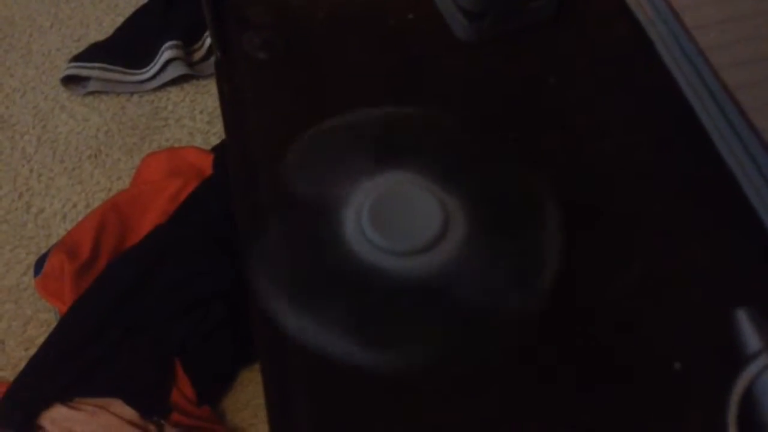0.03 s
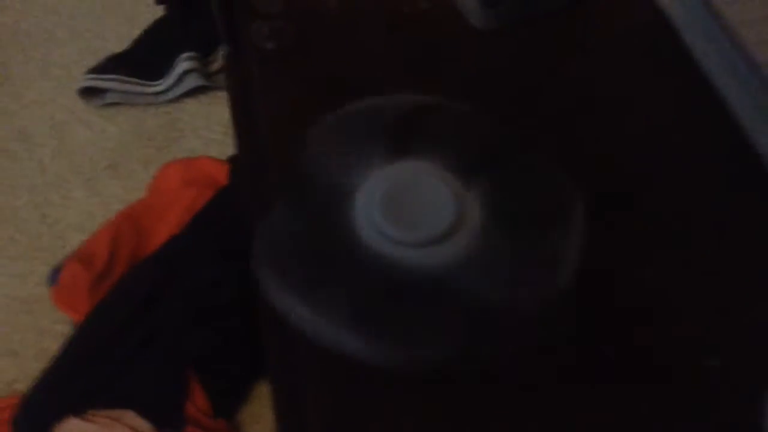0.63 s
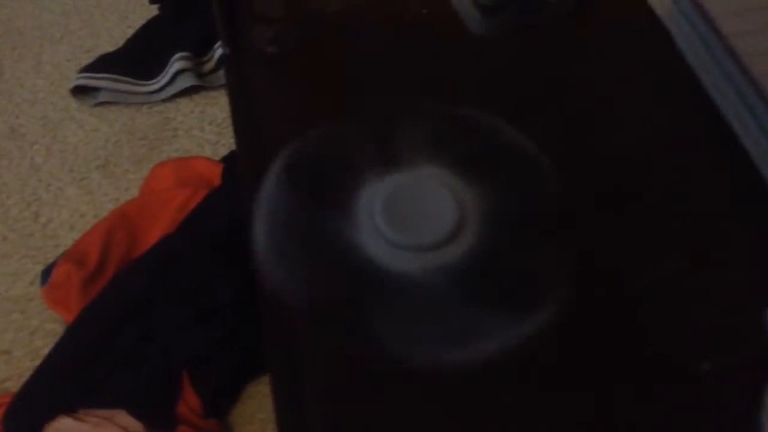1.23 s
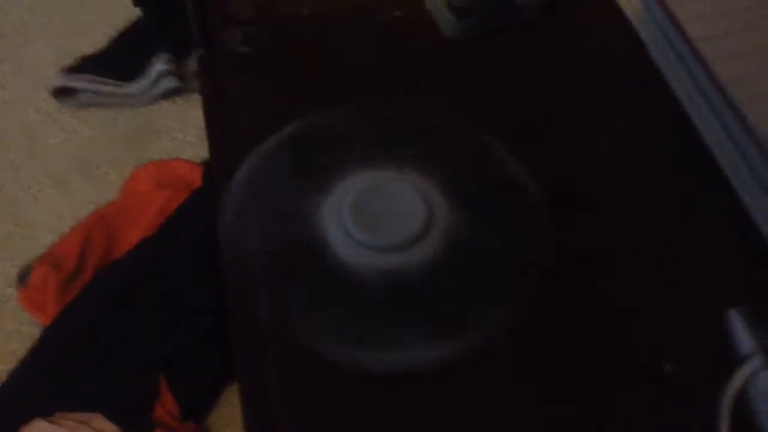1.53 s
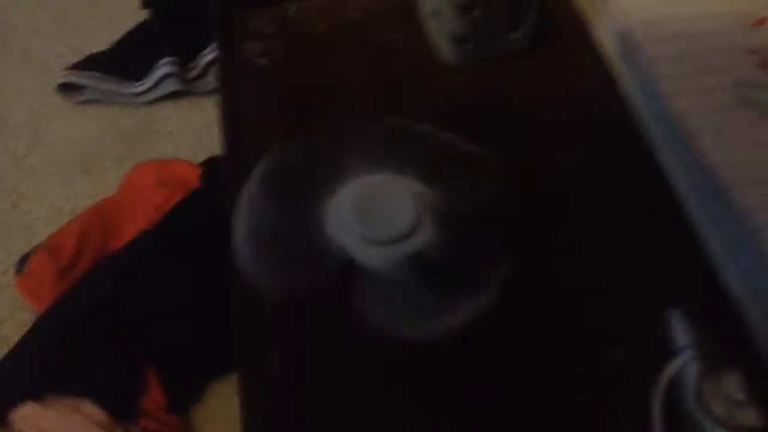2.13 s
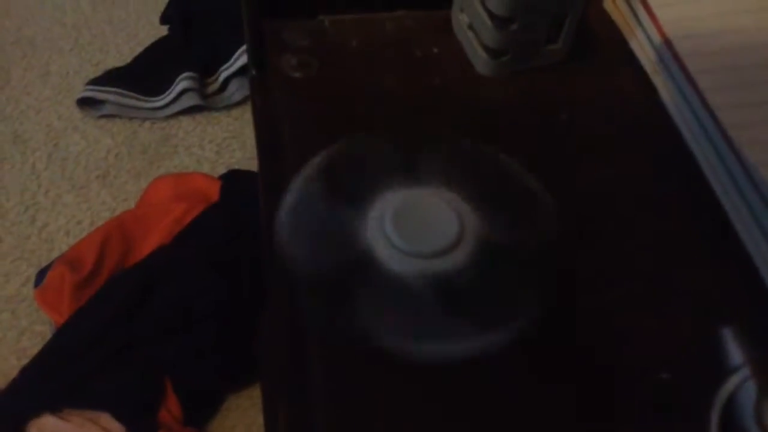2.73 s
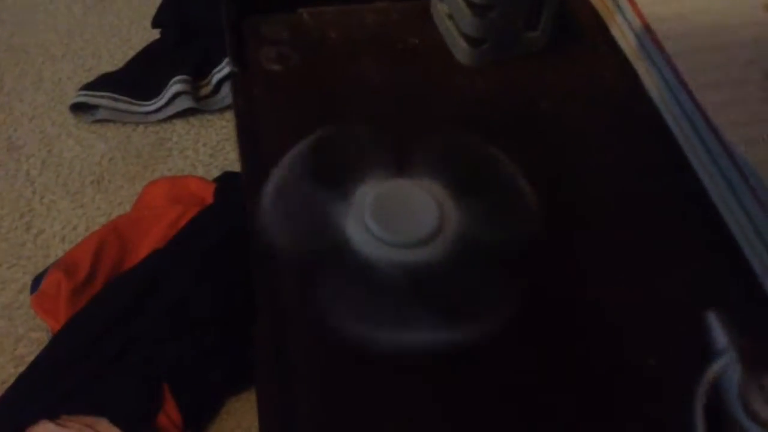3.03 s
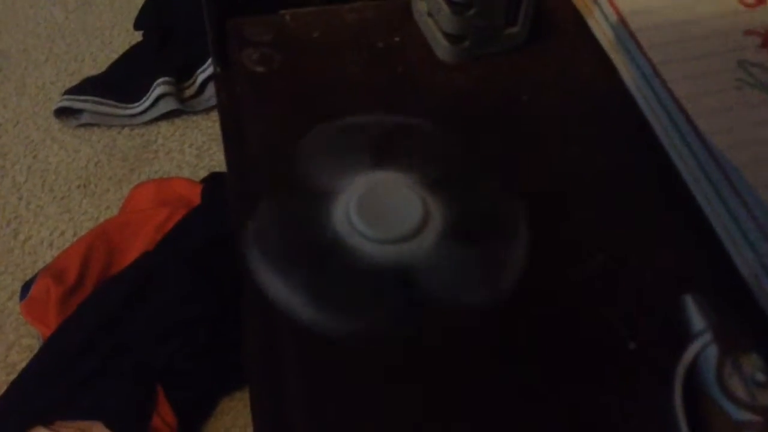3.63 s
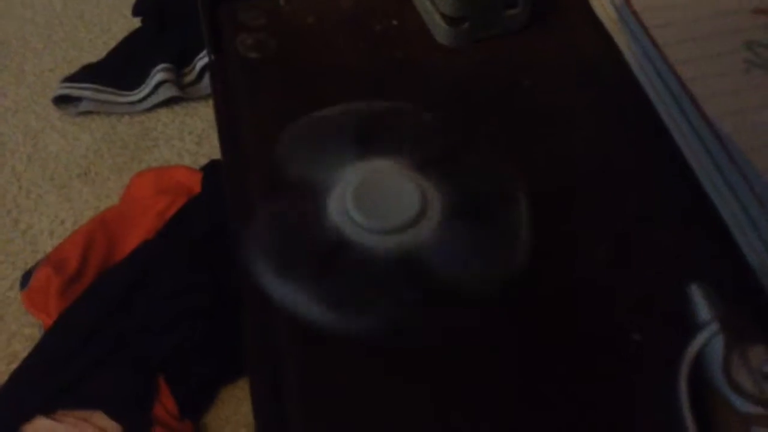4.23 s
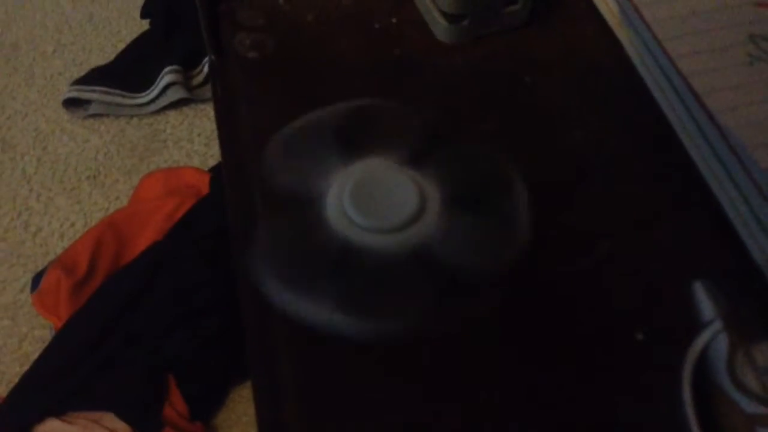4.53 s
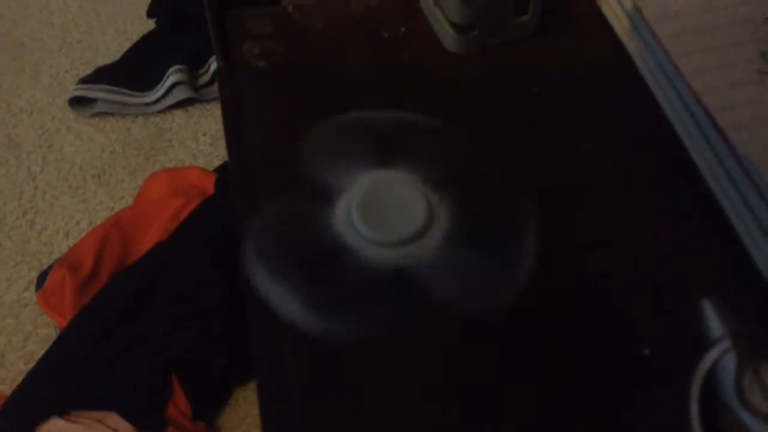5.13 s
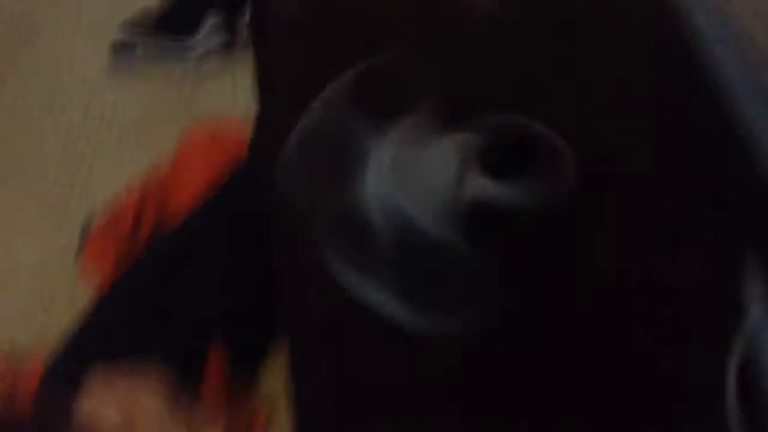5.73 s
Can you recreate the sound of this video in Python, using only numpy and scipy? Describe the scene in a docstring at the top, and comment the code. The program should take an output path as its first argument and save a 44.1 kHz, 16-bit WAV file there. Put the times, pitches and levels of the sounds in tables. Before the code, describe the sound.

Faint bearing hiss and rumble of a coasting fidget spinner, interrupted by a bright click and close handling thumps and rubs.

```python
"""Fidget spinner on a desk

A spinner coasts in a quiet room: its steel bearing hisses, slowly fading, and rumbles through the desk.
Something hard scuffs and snaps close by. Then fingers shift on the hand-held recorder, bumping and
rubbing its case, and do so again near the end. A faint electronic whine sits under it all."""
import sys
import numpy as np
from scipy import signal
from scipy.fft import rfft, irfft
from scipy.io import wavfile

SR = 44100
rng = np.random.default_rng(int(sys.argv[2]) if len(sys.argv) > 2 else 0)


def store_wav(level_fs):
    """Save 16-bit WAV to argv[1]."""
    pcm = np.round(np.clip(np.atleast_2d(level_fs), -1, 1) * 32767)
    wavfile.write(sys.argv[1], SR, pcm.T.astype(np.int16))


N = 259308
TIME = np.arange(N) / SR
BIN_HZ = np.maximum(np.fft.rfftfreq(N, 1 / SR), 1)


def from_db(db):
    """Decibels to gain."""
    return 10 ** (np.asarray(db) / 20)


def rms_one(x):
    """Scale to unit rms."""
    return x / np.sqrt(np.mean(x ** 2) + 1e-20)


def colour(points):
    """An EQ curve drawn through (Hz, dB) points."""
    hz, db = np.transpose(points)
    return from_db(np.interp(np.log(BIN_HZ), np.log(hz), db))


def shaped(x, curve):
    """Steady sound through an EQ curve, at unit rms."""
    return rms_one(irfft(rfft(x) * curve, N))


def butter(x, hz, kind, order=2):
    """Causal low- or high-pass."""
    return signal.sosfilt(signal.butter(order, np.clip(hz, 10, .45 * SR), kind, fs=SR, output="sos"), x)


def grains(per_s, spread_db):
    """Random micro-impacts of uneven size, at unit rms."""
    sizes = from_db(spread_db * np.minimum(rng.exponential(1, N), 5)) * rng.choice([-1, 1], N)
    return rms_one(sizes * (rng.random(N) < per_s / SR))


def struck(modes, t, pitch=1, ring=1):
    """Decaying modes after a blow at t = 0."""
    return sum(from_db(db - 60 * t / (t60 * ring)) * np.cos(2 * np.pi * hz * pitch * t)
               for hz, db, t60 in modes)


def add(out, start_s, sound):
    """Mix a short sound in at its start time."""
    at = round(start_s * SR)
    out[at:at + len(sound)] += sound[:N - at]


def waver(rate_hz, depth_db):
    """A gain that glides between random levels."""
    knots = np.arange(0, TIME[-1] + 1, 1 / rate_hz)
    return from_db(depth_db * np.interp(TIME, knots, rng.standard_normal(N)[:len(knots)]))


def swell(start, end, lateness):
    """An envelope that builds, peaks after the middle and fades."""
    return np.sin(np.pi * np.interp(TIME, [start, end], [0, 1]) ** lateness)


def whine(hz=12000, level_db=-72):
    """The thin, steady tone of the electronics."""
    return from_db(level_db) * np.sin(2 * np.pi * hz * TIME)


def finger_rubs(fast_rasp_db=-35.5, rasp_db_per_octave=130):
    """Skin sticks and slips on the case: coarse slips rumble, fine ones rasp."""
    # Finger strokes. Each row: start and end in seconds, rumble level in dB, rasp level in dB.
    strokes = [(1.779, 1.853, -44.5, -35.5), (2.034, 2.168, -51, -49.5), (2.188, 2.219, -42, -50.5),
               (2.196, 2.28, -43.5, -62), (2.288, 2.387, -48.5, -52), (5.24, 5.372, -54.5, -77),
               (5.478, 5.536, -49.5, -65), (5.625, 5.685, -44.5, -54.5), (5.671, 5.76, -43, -53)]
    # EQ curves of the rumble and the rasp. Each row: frequency in Hz, gain in dB.
    rumble_eq = [(30, -38), (100, -9), (150, 6.5), (230, 12), (400, 2.5), (1200, -6.5), (2000, -19.5),
                 (3500, -32), (6000, -28)]
    rasp_eq = [(500, -12), (1050, 2), (1400, -5), (1900, -3.5), (2800, -13), (3900, -13.5), (4500, 4),
               (5650, 3.5), (6150, 4.5), (7400, -3.5), (9000, -11), (10000, -15), (15000, -41)]
    rumble = shaped(grains(per_s=900, spread_db=3.0), colour(rumble_eq))
    fine_slips = grains(per_s=20000, spread_db=.5)
    out = np.zeros(N)
    for start, end, rumble_db, rasp_db in strokes:
        pitch = 2 ** ((rasp_db - fast_rasp_db) / rasp_db_per_octave)   # faster is louder and higher
        rasp = shaped(fine_slips, colour(np.array(rasp_eq) * [pitch, 1]))
        out += swell(start, end, lateness=1.25) * (from_db(rumble_db) * rumble + from_db(rasp_db) * rasp)
    return out


def finger_bumps(firm_contact_hz=1150):
    """A fingertip thuds on the hand-damped case; the harder the contact, the louder its tick."""
    # Fingertip hits. Each row: start in seconds, level in dB, rebound from 0 (stays on) to 1
    # (springs off), ring-length factor, contact cut-off in Hz.
    hits = [(1.356, -42.5, 0.4, .9, 400), (1.7577, -7.5, 0.99, 1.0, 1125), (1.9746, -32, .1, 1.0, 900),
            (1.9901, -18.5, 0.15, 1.0, 1580), (1.9951, -20.5, 0.22, 1.0, 1450), (2.08, -35, .1, .8, 600),
            (2.1248, -29, 0, 1.0, 950), (2.234, -37, .4, .8, 650), (2.254, -37, 0.1, 1.0, 450),
            (2.383, -38, .1, 0.57, 450), (4.047, -49, .05, .9, 300), (5.271, -43, 0.1, .9, 450),
            (5.5559, -27, 0.55, 0.19, 1200), (5.655, -36.5, .15, 1.0, 650), (5.699, -30, 0.65, .5, 890),
            (5.719, -32, 0.6, 0.55, 1050), (5.733, -31, 0.47, .9, 720)]
    # The case's low thud and high tick modes. Each row: frequency in Hz, level in dB, T60 in seconds.
    thud_modes = [(212, 2.5, 0.039), (319, -11, 0.053), (523, -17.5, 0.012), (985, -21, 0.015)]
    tick_modes = [(4600, -7.5, 0.0073), (5430, -2, 0.003), (5870, -16, .003)]
    out, t = np.zeros(N), TIME[:SR // 8]
    tick = butter(struck(tick_modes, t), 3550, "high", order=4)
    tick = butter(tick, 8300, "low", order=4)
    for start, db, rebound, ring, contact_hz in hits:
        pitch = .85 + 0.18 * rebound   # a finger that stays on loads the case and lowers its ring
        bass_cut_hz = 58 * 2 ** (1.92 * rebound)   # one that springs off leaves little bass
        thud = butter(struck(thud_modes, t, pitch, ring), contact_hz, "low", order=5)
        thud = butter(thud, bass_cut_hz, "high", order=4)
        tick_db = -12 + 12 * np.log2(contact_hz / firm_contact_hz)
        add(out, start, from_db(db) * (thud + from_db(tick_db) * tick))
    return out


def snaps(touches=3, gap_s=.002, loss_db=6, crack_db=-4, tail_db=-5, tail_t60_s=0.014):
    """Each snap chatters: quick touches, each weaker than the last, each a crack with a short tail."""
    # Hard snaps and small ticks. Each row: start in seconds, level in dB.
    hits = [(1.166, -45), (1.457, -33), (1.472, -28.5), (1.508, -31), (1.5243, -14), (1.5336, -6),
            (3.19, -42)]
    # Bright modes of the snapped thing. Each row: frequency in Hz, level in dB, T60 in seconds.
    crack_modes = [(6210, 0.5, 0.0069), (8200, -14, 0.0072), (10700, 3, 0.0038), (13400, 0, .002)]
    # EQ curve of the dense ring-out. Each row: frequency in Hz, gain in dB.
    tail_eq = [(88, -54.5), (150, -16), (1550, -17.5), (3060, -21.5), (4330, -12.5), (5150, -20.5),
               (6250, -2.5), (7730, -11.5), (8190, -2.5), (10300, -10), (15200, -20)]
    out, t = np.zeros(N), TIME[:SR // 10]
    crack = butter(struck(crack_modes, t), 4600, "high", order=3)
    tail_noise = shaped(rng.standard_normal(N), colour(tail_eq))
    decay = from_db(-60 * t / tail_t60_s)
    for start, db in hits:
        for touch in range(touches):
            tail = np.roll(tail_noise, rng.integers(N))[:len(t)] * decay
            contact = from_db(crack_db) * crack + from_db(tail_db) * tail
            add(out, start + touch * gap_s, from_db(db - touch * loss_db) * contact)
    return out


def wash_and_scuffs():
    """A faint, soft wash of noise swells and fades around the snaps; three short scuffs sit on top."""
    # The wash first, then the three scuffs. Each row: start and end in seconds, level in dB.
    swells = [(1.305, 1.702, -48.5), (1.456, 1.486, -38), (1.482, 1.526, -36.5), (1.525, 1.593, -40.5)]
    # EQ curve of the noise they share. Each row: frequency in Hz, gain in dB.
    noise_eq = [(470, -28.5), (800, -13.5), (1170, -8), (1460, -6), (2990, -6), (3970, 1), (4600, -6.5),
                (8410, 2), (15200, -1)]
    noise = shaped(grains(per_s=20000, spread_db=3.0), colour(noise_eq))
    envelope = sum(from_db(db) * swell(start, end, lateness=1.1) for start, end, db in swells)
    return noise * envelope


def desk_response(early):
    """Desk and spinner resonances, heard from the early (1) or late (0) microphone position."""
    # Resonances the bearing drives. Each row: frequency and width in Hz, level in dB,
    # extra dB at the early position.
    resonances = [(245, 83, 0, -0.6), (307, 37, 2, -1.3), (380, 27, 1, -2.5), (458, 64, -5.5, 6),
                  (552, 226, -2, -1.5), (685, 99.5, 2, 1.2), (914, 72, -6, -3), (1013.4, 124, -4.5, 5),
                  (1279, 136, -10, 1.2), (1490, 190, -19.5, 0.4), (1650, 198, -14.5, 6.5),
                  (2040, 440, -22.5, 4), (2334, 125, -12.5, 4.5), (2470, 157, -12, 3.5),
                  (2744, 61, -24.5, 12.6), (2867, 340, -16.5, 1.2)]
    # The broad floor under them. Each row: frequency in Hz, gain in dB.
    floor_eq = [(30, -45.5), (60, -43.5), (100, -26.5), (160, -10), (300, -8.5), (800, -31), (2000, -29),
                (3300, -32.5), (5000, -21.5), (9000, -25.5)]
    power = sum(from_db(db + early * extra_db) ** 2 / (1 + (1.49 * (BIN_HZ - hz) / width) ** 2) ** 3
                for hz, width, db, extra_db in resonances)
    return np.sqrt(power + colour(floor_eq) ** 2)


def race_response():
    """Tone of the steel balls in their race: a broad hiss, lifted where the race rings."""
    # EQ curve of the hiss. Each row: frequency in Hz, gain in dB.
    hiss_eq = [(1880, -55), (3200, -21), (3510, -23), (4320, -27.5), (5360, -14), (6180, -5), (7230, 1.5),
               (8510, -8), (9020, -12), (9950, -12.5), (10700, -16), (11600, -11), (12700, -24),
               (14600, -22), (15200, -20)]
    # Ringing peaks of the race. Each row: frequency and width in Hz, lift in dB.
    rings = [(5870, 105, 6.5), (6240, 88, 4), (6880, 140, 1.5), (7420, 59, 1), (7500, 53, 2),
             (8310, 170, 5.5), (9680, 360, 4.5)]
    lift_db = sum(db / (1 + (2 * (BIN_HZ - hz) / width) ** 2) for hz, width, db in rings)
    return colour(hiss_eq) * from_db(lift_db)


def rotor_wobble(first_hz, last_hz, depth_db):
    """The unbalanced rotor loads the bearing once a turn, ever more slowly."""
    turns = np.cumsum(np.linspace(first_hz, last_hz, N)) / SR
    return from_db(depth_db * np.sin(2 * np.pi * (turns + rng.random())))


def spinner(rumble_db=-51.5, hiss_db=-46, hiss_fade_db_per_s=1.43):
    """Balls roll over tiny pits: the steel hiss fades as the rotor slows, the desk rumble holds."""
    # The microphone moves with the grip; before that it hears a touch more rumble and less hiss.
    move_centre_s, move_length_s = 1.54, 0.96
    early_rumble_db, early_hiss_db = 0.4, -2.0
    early = np.clip(.5 + (move_centre_s - TIME) / move_length_s, 0, 1)
    load = rotor_wobble(first_hz=10.0, last_hz=7.8, depth_db=0.53)
    rolling = grains(per_s=5000, spread_db=-1.5) * load
    early_rumble = shaped(rolling, desk_response(early=0.97)) * from_db(early_rumble_db)
    late_rumble = shaped(rolling, desk_response(early=0))
    rumble = early * early_rumble + (1 - early) * late_rumble
    ticking = grains(per_s=26000, spread_db=4.0) * load
    ticking *= waver(rate_hz=40, depth_db=1.5)   # the balls bunch and spread in their cage
    hiss = butter(shaped(ticking, race_response()), 2700, "high")
    hiss_gain = from_db(hiss_db - hiss_fade_db_per_s * TIME + early * early_hiss_db)
    return rumble * from_db(rumble_db) + hiss * hiss_gain


def scene():
    """A dry mono mix: everything is close to the one microphone."""
    bearing = spinner()
    snap_layer = butter(snaps() + wash_and_scuffs(), 160, "high")   # keep this layer free of bass
    return (bearing + snap_layer + finger_bumps() + finger_rubs() + whine())[None]


def record(dry, low_cut_hz=35, high_cut_hz=15400):
    """The deepest bass is rolled off and the top is cut steeply."""
    high_cut = signal.ellip(12, .1, 90, high_cut_hz, fs=SR, output="sos")
    return signal.sosfilt(high_cut, butter(dry, low_cut_hz, "high"))


dry = scene()
out = record(dry)
store_wav(out)
```